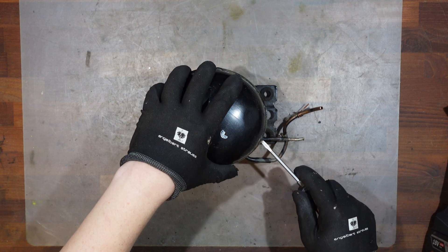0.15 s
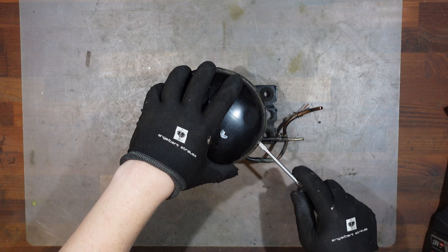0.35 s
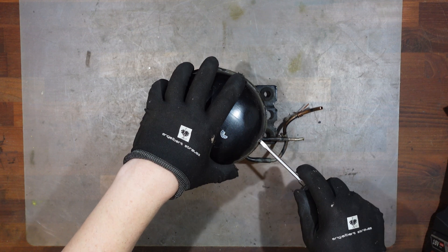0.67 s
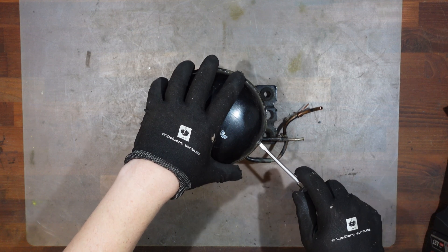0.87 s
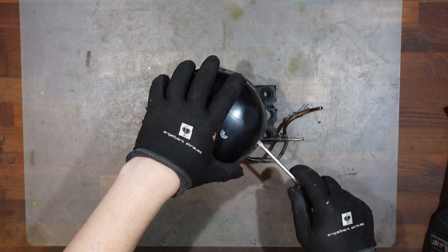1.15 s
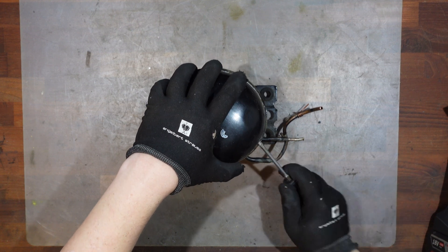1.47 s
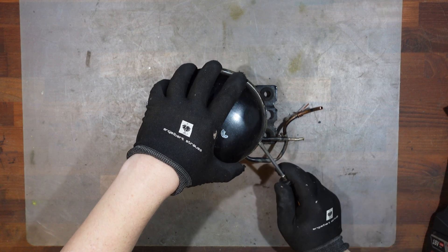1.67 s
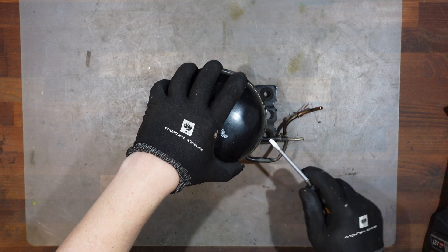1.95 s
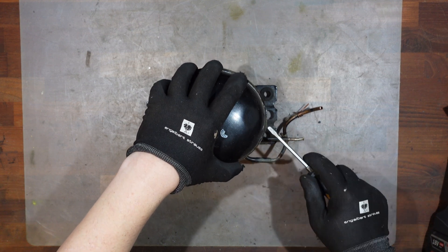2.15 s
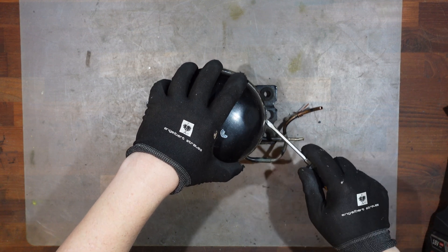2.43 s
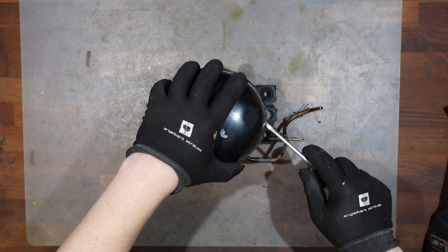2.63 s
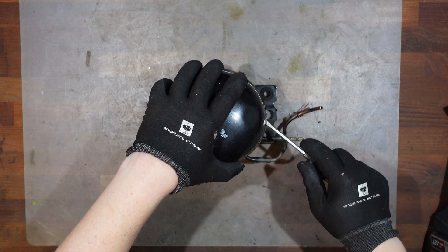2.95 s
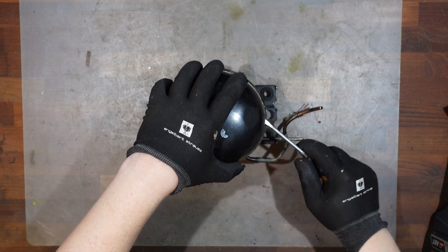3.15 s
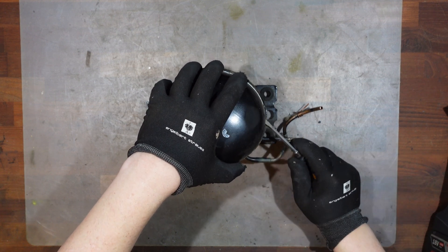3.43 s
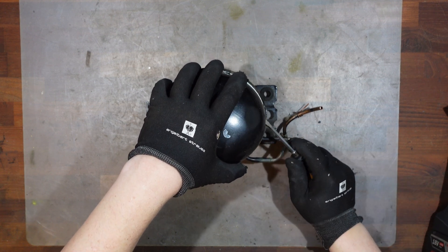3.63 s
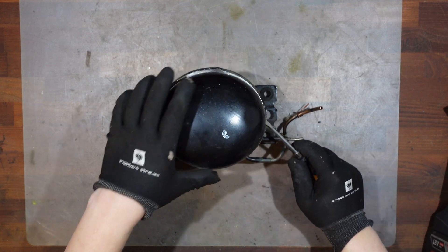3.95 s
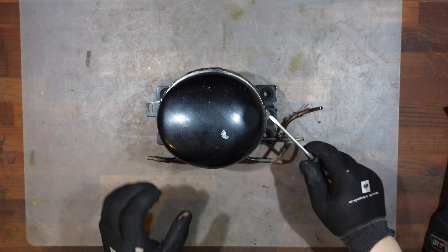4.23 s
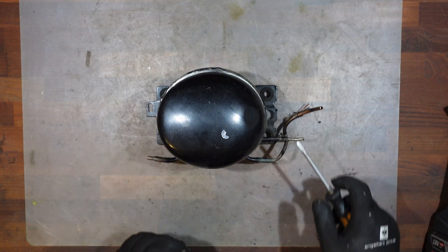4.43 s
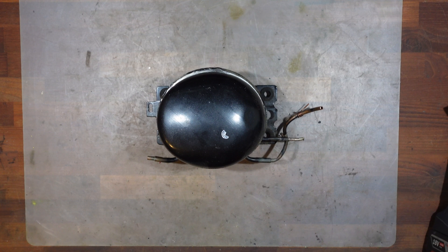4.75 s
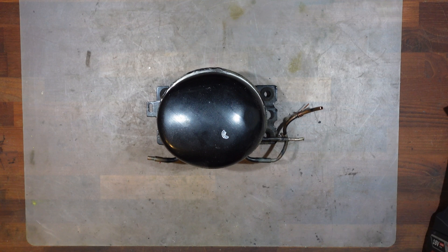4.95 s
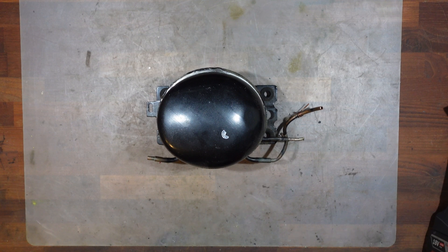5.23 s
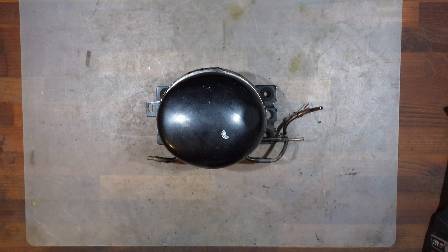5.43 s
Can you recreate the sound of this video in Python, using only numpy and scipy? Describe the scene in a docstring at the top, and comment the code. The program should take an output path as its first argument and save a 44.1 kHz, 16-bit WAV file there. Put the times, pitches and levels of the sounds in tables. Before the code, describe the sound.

Close-up metal prying in a small workshop, with sparse creaks and knocks, a harsh slip and low boom, later snaps, a lid clank and quiet room.

```python
"""On a workbench in a small workshop, a screwdriver pries the cut lid off a steel compressor housing.
First the lid creaks, a faint sliding hiss passes, perhaps the blade along the seam, and the lid knocks.
Burrs snap, then the blade slips and grinds along the rim: noise and ringing shell modes; the housing booms.
More creaks and snaps follow, a glove slides off the lid, and the blade leaves past a pipe stub that pings.
Two close microphones hear bench and room echoes throughout, over rumble, hiss and a faint electronic whine."""
import sys
import numpy as np
from scipy import signal
from scipy.fft import rfft, irfft
from scipy.io import wavfile
from scipy.ndimage import uniform_filter1d

SR = 44100
rng = np.random.default_rng(int(sys.argv[2]) if len(sys.argv) > 2 else 0)


def transcribe(u):
    """Save the signal u as a 16-bit wav file named by the first command-line argument.

    u: samples, shape (n,) or (channels, n), limited to [-1, 1]; the rate is SR.
    q: integer samples, one column per channel.
    """
    v = np.clip(np.atleast_2d(u).T, -1, 1)
    q = np.round(v * 32767).astype(np.int16)
    wavfile.write(sys.argv[1], SR, q)


N = 246519
TIME = np.arange(N) / SR

# the lid knocks on the shell: [t/s, level/dB, treble lift/dB]
LID_KNOCKS = [(0.9048, -31.5, 2), (0.9975, -40, -22), (1.073, -49.5, 0.5), (1.9236, -47, 2.5),
              (2.259, -56, -6), (4.2229, -30.5, 5.5), (4.2479, -43.5, -17)]
# the blade snaps over a burr: [t/s, level/dB]
BLADE_SNAPS = [(1.0386, -47.5), (1.197, -50), (1.893, -49.5), (3.2224, -51.5), (3.243, -53), (3.251, -43),
               (3.2831, -32), (3.3222, -22.5), (3.6143, -52.5), (3.634, -49), (3.927, -54), (4.1122, -51),
               (5.363, -57)]
# steel rubs on steel and sings: [t/s, length/s, level/dB, treble lift/dB, groan against the rub/dB, squeal f/Hz]
STEEL_CREAKS = [(0.116, 0.037, -53, -46, -1, 1644), (0.119, 0.051, -56, -39, -5, 630),
                (0.374, 0.017, -64, 5, 8.5, 1290), (0.469, 0.032, -56.5, -7, 7.5, 1863),
                (0.923, .06, -57, -1, -25, 1200), (1.026, 0.066, -53, 5, -18, 2046),
                (1.916, 0.046, -55.5, -0.5, -4.5, 1406), (2.261, 0.054, -65, 0.5, -17, 1257),
                (2.333, 0.068, -61, 0, -13, 610), (2.655, 0.033, -57, -2.5, -17.5, 1436),
                (2.727, 0.057, -67, 4.5, -19, 1444), (2.778, 0.065, -55.5, 3.5, -2.5, 1436),
                (4.147, 0.032, -52.5, 2.5, -4, 1915), (4.16, 0.049, -50.5, 1, -14, 5120)]
# a jolt sets the heavy housing rocking on the bench: [t/s, level/dB, f/Hz]
HOUSING_JOLTS = [(0.888, -64.5, 82.7), (1.479, -39.5, 70.2), (3.132, -67.5, 66.5), (4.189, -65, 80.2)]
# the blade brushes a pipe stub on its way out: [t/s, level/dB, f/Hz, t60/s]
STUB_PING = (4.247, -44.5, 1722, .27)
# soft sliding hisses over the lid, from blade or glove: [t/s, length/s, level/dB]
SOFT_SLIDES = [(0.444, 0.55, -71), (3.575, 0.59, -70)]

# modes of the open shell: [f/Hz, relative level/dB]
SHELL_MODES = [(125, -15), (220, -11), (315, -11), (1453, -12), (1507, -9), (1620, -9), (1770, -8),
               (2291, -6), (2325, -11), (2490, -14), (2826, -13), (3222, -6), (3307, -8), (3350, -8),
               (4333, 3), (4700, -10), (4825, -10), (5219, -.5), (5275, -9), (5633, -6), (6067, -11),
               (6213, -7), (6295, -10), (6660, -11), (7120, -14), (7978, -12), (9543, -12), (10318, -12),
               (10730, -16), (12200, -23), (14368, -21)]
# how long the shell modes ring: [f/Hz, t60/s]
SHELL_DECAY = [(300, 0.07), (1500, 0.22), (4300, 0.051), (5200, 0.11), (7000, 0.23), (14000, 0.12)]
# modes of the lid seated on its seam: [f/Hz, relative level/dB, t60/s]
LID_MODES = [(1230, -5.5, 0.2), (1600, -0.5, 0.142), (4240, -3, 0.29), (4113, -17, 0.24), (4760, -15, 0.08),
             (5200, 6, 0.16), (4800, -3, 0.097), (6240, -8, 0.13), (6656, -4, 0.15), (9350, -7, 0.13)]
# modes of the screwdriver shaft: [f/Hz, relative level/dB, t60/s]
SHAFT_MODES = [(3014, -2.5, 0.066), (3630, -11.5, 0.04), (4880, -7, 0.075), (9500, -20, 0.071),
               (8970, -33, 0.045), (9770, 9, 0.084)]
# resonances of the lid while the glove damps it: [f/Hz, width/Hz, relative level/dB]
DAMPED_LID_MODES = [(656, 22, -3.5), (1090, 41, 0.5), (1228, 50, 2), (1424, 70, -21.5), (1720, 250, 5),
                    (2180, 82, 0), (2764, 120, 0), (3270, 160, -1.5), (3610, 220, 0.5), (4170, 1100, -16),
                    (5070, 160, -5.5), (5900, 92, -13.5), (8000, 88, -4.5), (9600, 360, -22)]

# colour of the crowd of short-lived shell modes: [f/Hz, relative level per Hz/dB]
SHELL_SPECTRUM = [(60, -17), (170, -18.5), (370, -11), (800, -11.5), (1600, -2.5), (2000, -3), (2900, -4),
                  (3300, 1), (3800, -6), (4700, -2.5), (6400, -1.5), (8800, -13.5), (9700, -12),
                  (15400, -32)]
# the same for the lid: [f/Hz, relative level per Hz/dB]
LID_SPECTRUM = [(120, -40), (200, -7), (591, -22), (789, -34.5), (1020, -7), (1690, -2.5), (1880, -14.5),
                (2210, -4), (3670, -8), (4160, 2.5), (6650, -12.5), (7550, -20.5), (9720, -10.5),
                (12700, -32), (15000, -21.5)]
# the same for the blade: [f/Hz, relative level per Hz/dB]
BLADE_SPECTRUM = [(180, -66), (300, -43), (360, -29), (468, -46.5), (629, -27), (1010, -43.5),
                  (1210, -18.5), (1610, -25), (3600, -10), (8600, -11), (9650, -8), (10700, -14),
                  (15300, -9)]
# colour of the crack as the blade lets go: [f/Hz, relative level per Hz/dB]
CRACK_SPECTRUM = [(59, -44.5), (100, -9), (789, -13), (1610, -9), (3600, -9), (4260, -6.5), (4930, -17),
                  (5370, -9), (15400, -12.5)]
# colour of the soft sliding hisses: [f/Hz, relative level per Hz/dB]
SLIDE_SPECTRUM = [(500, -3), (1500, -3.5), (3000, -3.5), (6000, 2.5), (10000, 1.5), (15000, -31)]

# decay of the workshop: [f/Hz, t60/s]
ROOM_DECAY = [(100, 1), (500, 0.42), (1500, 0.57), (4000, 0.44), (8000, 0.37), (15000, 0.23)]
# colour of the still workshop: [f/Hz, relative level per Hz/dB]
AIR_SPECTRUM = [(30, -35), (60, -19), (100, -8), (160, -3), (250, 0), (500, -5), (900, -8.5), (1600, -10.5),
                (2600, -13.5), (4000, -15), (5500, -17.5), (8500, -19.5), (12000, -22), (15000, -23.5)]
# width of the background: [f/Hz, side against middle/dB]
AIR_WIDTH = [(60, -4.5), (110, -0.5), (200, -2), (380, -4.5), (700, -4), (1290, -4), (2380, -5), (4400, -5),
             (8120, -5), (15000, -7.5)]
# tones of the electronic whine, before a slight lean to one side: [f/Hz, level/dB]
WHINE_TONES = [(15731, -58.5), (15752, -69), (15716, -71)]

# the slip: a crack, then the blade skims lightly, bites into the rim, grinds at full force and runs out
BREAK_S, BREAK_DB = 1.4626, -17
SKIM_S, BITE_S, GRIND_S = 0.019, 0.032, 0.075
SKIM_DB, GRIND_DB, RUN_OUT_DB_PER_S = -30.5, -21, 268
SLIP_TREBLE_DB, DULLING_DB_PER_S = 11.5, 98.5   # the grinding dulls as the blade slows
SNAP_TREBLE_DB, SNAP_RING_DB = -0.5, -13.5   # top of the snap; clear shaft modes against the clank
KNOCK_RING_DB = -5.5   # clear modes of the lid against the clank
GROAN_HZ, SQUEAL_DB = 1002.6, -2   # one groan note for every creak; squeal against the rub
ROCK_SWELL_S = 0.11   # from jolt to the loudest boom
ROCK_UPPER_RATIO, ROCK_UPPER_DB = 1.79, -14   # second mode of the housing on its mounts
SLIDE_FADE_S = 0.041
ROOM_SIDE_DB, BENCH_SIDE_DB = -5, -14   # side against middle of the stereo picture
AIR_DB = -63.8   # middle of the background
CUTOFF_HZ = 16300


def slip():
    """The blade breaks free and grinds over the cut rim, feeding the modes of the shell."""
    age = np.maximum(TIME - BREAK_S, 0)
    bite_end_s = SKIM_S + BITE_S
    bite_db = np.interp(age, [SKIM_S, bite_end_s], [SKIM_DB, GRIND_DB])
    run_out_s = np.maximum(age - (bite_end_s + GRIND_S), 0)
    force = from_db(bite_db - RUN_OUT_DB_PER_S * run_out_s) * (age > 0)
    catches = grit(per_s=4000, spread_db=0.5, size=N)
    grind = force * coloured(catches, SHELL_SPECTRUM)
    crack = np.zeros(N)
    blow = clank(CRACK_SPECTRUM, crack_t60=0.019, tail_db=-31, tail_t60=0.14)
    add(crack, BREAK_S, from_db(BREAK_DB) * blow)
    drive = force * rms_one(catches) + crack
    modes = np.zeros(N)
    for hz, db in SHELL_MODES:
        modes += from_db(db) * rms_one(ring(drive, hz, at_hz(SHELL_DECAY, hz)))
    # the clear modes carry a little less energy than the crowd of short-lived ones
    shell = .76 * grind + .65 * np.std(grind) * rms_one(modes)
    return crack + brighten(shell, SLIP_TREBLE_DB - DULLING_DB_PER_S * age)


def lid_knocks():
    """The lid drops back on the seam: a clank with the clear lid modes ringing through."""
    out = np.zeros(N)
    for s, db, treble_db in LID_KNOCKS:
        noise = clank(LID_SPECTRUM, crack_t60=0.056, tail_db=-14.5, tail_t60=0.22)
        ringing = chime(LID_MODES) / np.sqrt(len(LID_MODES))
        blow = noise + from_db(KNOCK_RING_DB) * ringing
        add(out, s, from_db(db) * brighten(blow, treble_db))
    return out


def blade_snaps():
    """The tip jumps in the seam and the shaft pings."""
    out = np.zeros(N)
    for s, db in BLADE_SNAPS:
        noise = clank(BLADE_SPECTRUM, crack_t60=0.058, tail_db=-20.5, tail_t60=0.16)
        blow = noise + from_db(SNAP_RING_DB) * chime(SHAFT_MODES)
        add(out, s, from_db(db) * brighten(blow, SNAP_TREBLE_DB))
    return out


def creaks(size=8820):
    """Short rubs of the lid under the lever: an unsteady groan and squeal over gritty scraping."""
    out = np.zeros(N)
    for s, length, db, treble_db, groan_db, squeal_hz in STEEL_CREAKS:
        stroke = np.cbrt(np.sin(np.pi * np.minimum(TIME[:size] / length, 1)))
        pressure = stroke * from_db(1.2 * wander(size))   # the steel sticks and gives unevenly
        groan = from_db(groan_db) * wavering_tone(GROAN_HZ, waver_hz=33, size=size)
        squeal = from_db(SQUEAL_DB) * wavering_tone(squeal_hz, waver_hz=67.7, size=size)
        scrape = brighten(rub(pressure), treble_db, corner_hz=2530)
        add(out, s, from_db(db) * (pressure * (groan + squeal) + scrape))
    return out


def rub(pressure):
    """Uneven slips rattle the damped resonances of the lid."""
    slips = pressure * grit(per_s=2800, spread_db=2.5, size=len(pressure))
    body = np.zeros(len(pressure))
    for hz, width_hz, db in DAMPED_LID_MODES:
        t60 = np.log(1000) / (np.pi * width_hz)   # a wide resonance dies fast
        body += from_db(db) * rms_one(ring(slips, hz, t60))
    return rms_one(body) * np.sqrt(np.mean(pressure ** 2))


def rocking():
    """The sprung mass hands its swing to the bench, so the boom swells before it dies."""
    out, age = np.zeros(N), TIME[:SR] / ROCK_SWELL_S
    swell = (age * np.exp(1 - age)) ** 2
    for s, db, hz in HOUSING_JOLTS:
        lower = wavering_tone(hz, waver_hz=3.6, size=SR)
        upper = wavering_tone(ROCK_UPPER_RATIO * hz, waver_hz=4.4, size=SR)
        add(out, s, from_db(db) * swell * (lower + from_db(ROCK_UPPER_DB) * upper))
    return out


def pipe_ping():
    """A thin tube rings with one clear note."""
    s, db, hz, t60 = STUB_PING
    out = np.zeros(N)
    note = np.sin(2 * np.pi * hz * TIME[:SR]) * fade(t60, size=SR)
    add(out, s, from_db(db) * note)
    return out


def soft_slides():
    """Many tiny catches blur into a soft sliding hiss; each stroke fades in, holds and fades out."""
    strokes = np.zeros(N)
    for s, length, db in SOFT_SLIDES:
        to_nearest_end_s = np.minimum(TIME - s, s + length - TIME)
        strokes += from_db(db) * np.clip(to_nearest_end_s / SLIDE_FADE_S, 0, 1)
    return strokes * coloured(grit(per_s=6100, spread_db=-3.0, size=N), SLIDE_SPECTRUM)


def bench_bounce(x, side_db, size=220):
    """First reflections from the bench reach the two sides a little differently."""
    scatter = rms_one(rng.standard_normal(size) * fade(.008, size=size)) / np.sqrt(size)
    return close_pair(x, signal.fftconvolve(x, scatter)[:N], side_db)


def workshop(x, wet_db, side_db, build_s, size=35280):
    """Diffuse echoes build up within milliseconds and die sooner high in the treble."""
    edges = np.geomspace(50, 16000, num=10)
    tail = np.zeros((2, size))
    for low, high in zip(edges, edges[1:]):
        band_pass = signal.butter(2, [low, high], "band", fs=SR, output="sos")
        band = signal.sosfilt(band_pass, rng.standard_normal((2, size)))
        tail += band * fade(at_hz(ROOM_DECAY, np.sqrt(low * high)), size=size)
    build_up = 1 - np.exp(-TIME[:size] / build_s)
    mid, side = rms_one(tail * build_up) / np.sqrt(size)
    echoes = signal.fftconvolve(x[None], close_pair(mid, side, side_db), axes=1)
    return from_db(wet_db) * echoes[:, :N]


def close_pair(mid, side, side_db):
    """Two microphones close together hear long waves alike and differ only higher up."""
    apart = signal.sosfilt(signal.butter(1, 700, "high", fs=SR, output="sos"), side)
    return mid + from_db(side_db) * apart * np.array([[1], [-1]])


def background():
    """Wide room rumble, hiss and a thin beating electronic whine."""
    mid, side = (coloured(white, AIR_SPECTRUM) for white in rng.standard_normal((2, N)))
    hz = np.arange(N // 2 + 1) * SR / N
    apart = irfft(rfft(side) * from_db(at_hz(AIR_WIDTH, hz)), N)
    air = from_db(AIR_DB) * (mid + apart * np.array([[1], [-1]]))
    whine = sum(from_db(db) * wavering_tone(tone_hz, waver_hz=2.5, size=N) for tone_hz, db in WHINE_TONES)
    return air + whine * from_db([[-.3], [.3]])


def clank(colour, crack_t60, tail_db, tail_t60, size=22050):
    """A blow wakes countless close modes: a hard crack, then a weaker wash."""
    envelope = fade(crack_t60) + from_db(tail_db) * fade(tail_t60)
    return coloured(rng.standard_normal(size), colour) * envelope


def chime(modes, size=22050):
    """The clear modes ring on, each struck a little differently every time."""
    strengths = from_db(rng.normal(0, 0.69, len(modes))) * rng.choice([-1, 1], len(modes))
    out = np.zeros(size)
    for strength, (hz, db, t60) in zip(strengths, modes):
        out += strength * from_db(db) * np.sin(2 * np.pi * hz * TIME[:size]) * fade(t60, size)
    return out


def ring(force, hz, t60):
    """One mode driven by a force; it radiates no deep bass."""
    radius = np.exp(-np.log(1000) / (t60 * SR))
    angle = 2 * np.pi * hz / SR
    return signal.lfilter([1, 0, -1], [1, -2 * radius * np.cos(angle), radius ** 2], force + 1e-18)


def grit(per_s, spread_db, size):
    """Tiny catches on a rough surface, random in time and strength."""
    strengths = from_db(spread_db * np.minimum(rng.exponential(1, size), 4))
    signs = rng.choice([-1, 1], size)
    return strengths * signs * (rng.random(size) < per_s / SR)


def wavering_tone(hz, waver_hz, size):
    """A tone that wavers in pitch; rms 1."""
    return np.sqrt(2) * np.sin(2 * np.pi * np.cumsum(hz + waver_hz * wander(size)) / SR)


def wander(size):
    """Chance that changes every few milliseconds; spread about 1."""
    return rms_one(uniform_filter1d(rng.standard_normal(size + SR), size=220))[:size]


def fade(t60, size=22050):
    """Free decay by 60 dB in t60 seconds."""
    return from_db(-60 * TIME[:size] / t60)


def coloured(x, colour):
    """Give a signal a spectrum; rms 1."""
    hz = np.arange(len(x) // 2 + 1) * SR / len(x)
    return rms_one(irfft(rfft(x) * from_db(at_hz(colour, hz)), len(x)))


def brighten(x, treble_db, corner_hz=8000):
    """A harder contact lifts the top; negative decibels dull it."""
    top = signal.sosfiltfilt(signal.butter(2, corner_hz, "high", fs=SR, output="sos"), x)
    return x + (from_db(treble_db) - 1) * top


def from_db(db):
    """Decibels to gain."""
    return 10 ** (np.asarray(db) / 20)


def rms_one(x):
    """Scale to unit rms."""
    return x / np.sqrt(np.mean(x ** 2) + 1e-20)


def at_hz(points, hz):
    """Read a table on a log-frequency axis."""
    known_hz, values = np.transpose(points)
    return np.interp(np.log(np.maximum(hz, 1)), np.log(known_hz), values)


def add(track, s, sound):
    """Mix a sound into a track from time s."""
    start = round(s * SR)
    track[start:start + len(sound)] += sound[:N - start]


def scene():
    """All the handling sounds share one spot on the bench; the boom and background get no added echo."""
    handling = slip() + lid_knocks() + blade_snaps() + creaks() + pipe_ping() + soft_slides()
    room = workshop(handling, wet_db=-8.5, side_db=ROOM_SIDE_DB, build_s=0.0037)
    return bench_bounce(handling, BENCH_SIDE_DB) + room + rocking() + background()


def record(dry):
    """The deepest bass and the top are cut."""
    thin = signal.sosfilt(signal.butter(2, 38, "high", fs=SR, output="sos"), dry)
    return signal.sosfilt(signal.ellip(10, .1, 80, CUTOFF_HZ, fs=SR, output="sos"), thin)


dry = scene()
out = record(dry)
transcribe(out)
```